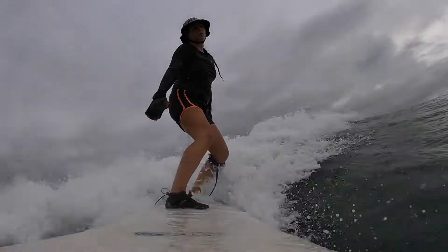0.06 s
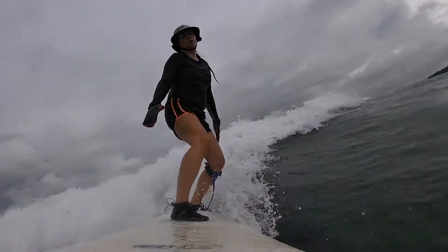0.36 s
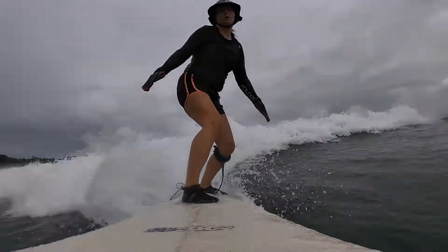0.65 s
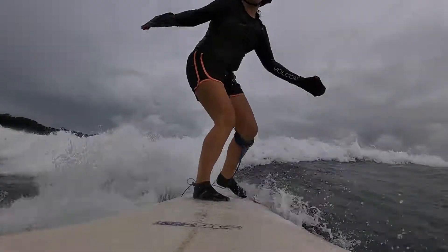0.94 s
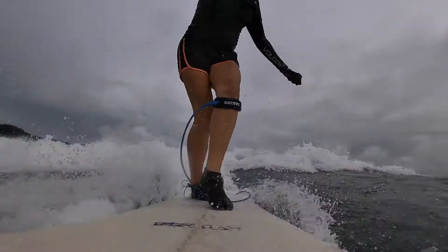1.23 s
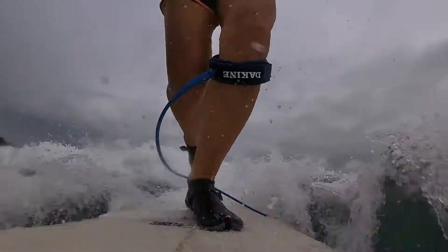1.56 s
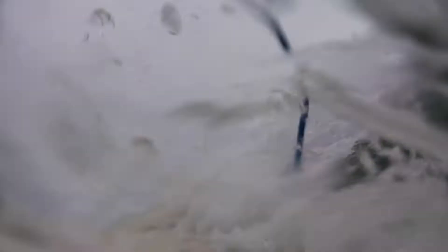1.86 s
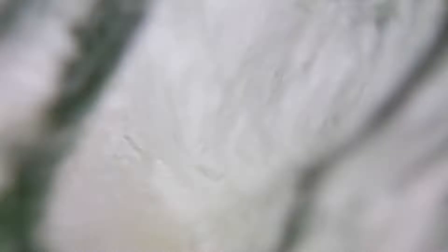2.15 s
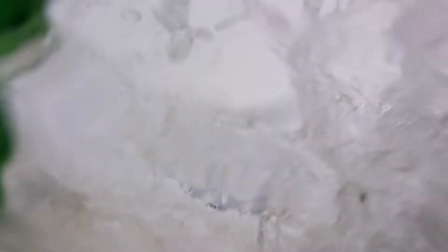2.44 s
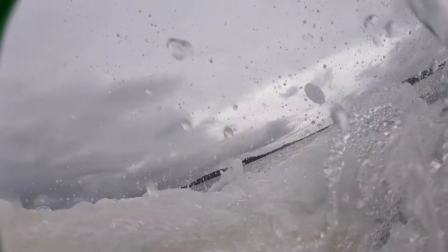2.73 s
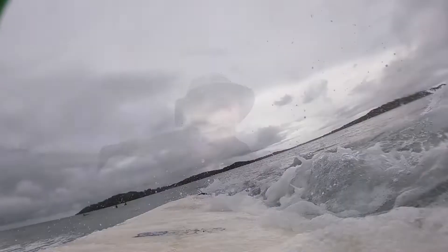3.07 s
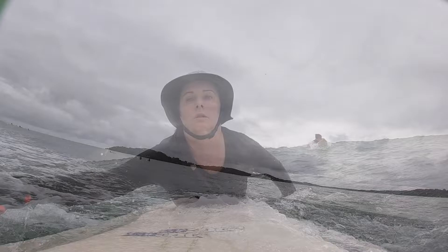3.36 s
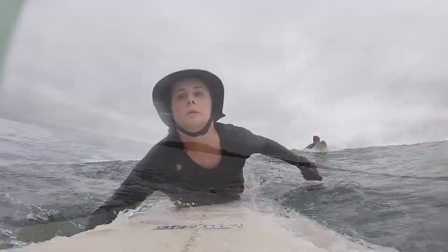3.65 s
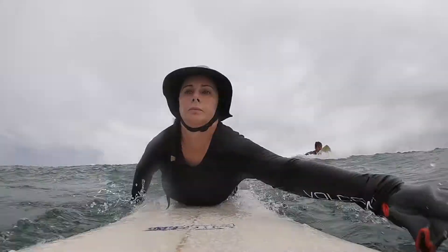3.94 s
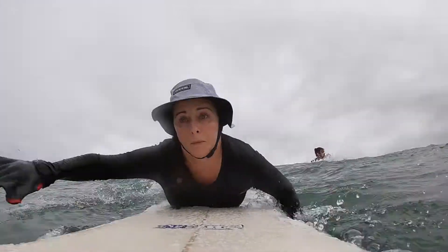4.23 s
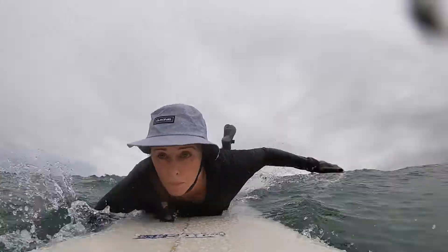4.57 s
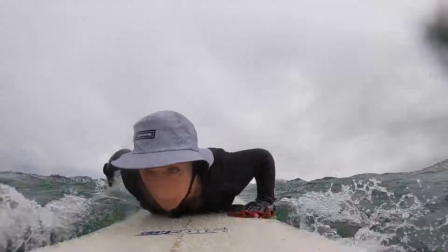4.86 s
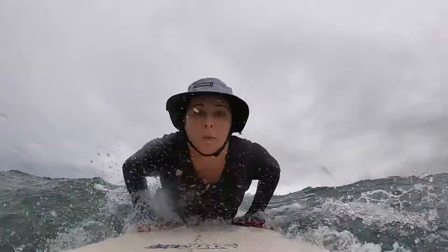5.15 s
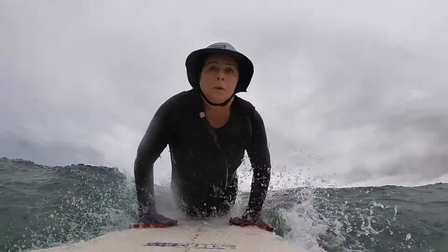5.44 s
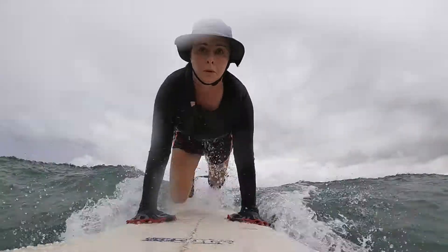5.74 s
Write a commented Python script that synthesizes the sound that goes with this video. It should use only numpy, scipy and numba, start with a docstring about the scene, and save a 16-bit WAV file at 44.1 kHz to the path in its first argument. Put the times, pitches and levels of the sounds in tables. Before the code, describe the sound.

Heard from a microphone mounted on a surfboard at sea, foaming water surges past with gusts of low wind rumble. A burst of hard splashes cuts off the hiss, leaving about a second and a half of dull underwater gurgling and knocking. As the water drains away, the bright wash returns with close paddling splashes, small plops and another windy surge.

```python
"""Whitewater, very close: bubbles slosh, wash and fizz around a microphone in a waterproof housing on
the nose of a surfboard, while wind buffets its port. A wave slaps down and holds it under for about a
second and a half: large bubbles gurgle, trapped air hums and collapsing cavities knock on the housing.
The port drains clear, paddle strokes splash alongside and the rush builds on the next wave."""
import sys
import numpy as np
from scipy import signal
from scipy.fft import rfft, irfft, next_fast_len
from scipy.io import wavfile
from scipy.ndimage import uniform_filter1d, minimum_filter1d
from numba import njit

SR = 44100
rng = np.random.default_rng(int(sys.argv[2]) if len(sys.argv) > 2 else 0)


def transcribe(signal):
    """Save signal, clipped to [-1, 1], as a 16-bit WAV file at the path in sys.argv[1]."""
    frames = np.atleast_2d(signal).T
    limited = np.clip(frames, -1, 1)
    pcm = np.round(limited * 32767).astype(np.int16)
    wavfile.write(sys.argv[1], SR, pcm)


N = 255780
TIME = np.arange(N) / SR

PLUNGE_S, SURFACE_S, CLEAR_S = 1.96, 3.22, 3.62   # the microphone goes under, comes up, has drained
FLOOD_DB_PER_S = 603.5   # how fast water closes over the port
SLOSH_DRAIN_DB_PER_S, WASH_DRAIN_DB_PER_S = 2, 31.5
FIZZ_DRAIN_DB_PER_S, SPRAY_DRAIN_DB_PER_S = 38.5, 30

# Table levels are set ahead of each source's own gain and filters.
# Steady rush around the board: (time [s], wind [dB], wash [dB], fizz [dB], spray [dB])
BOARD_RUSH = [(0, -26.5, -36, -44.5, -72), (.5, -30, -34, -45, -78.5), (.75, -29.5, -31, -41, -66.5),
              (1.15, -31.5, -33, -44, -64), (1.75, -31.5, -35, -37.5, -67),
              (3.85, -38.5, -36, -43.5, -71.5), (4.15, -30, -32, -42, -65),
              (4.55, -34.5, -34.5, -42, -66.5), (5.249, -24.5, -30.5, -41.5, -63.5),
              (5.5, -24.5, -34, -46, -75.5), (5.8, -30, -32, -44, -72)]
# Wave and paddle surges along the rails: (crest time [s], level [dB], port ring [dB], rise [s])
RAIL_SURGES = [(.25, -37.5, -56, 0.053), (.96, -29, -55, 0.078), (1.215, -26, -50, 0.067),
               (1.49, -26, -30, 0.06), (1.585, -25, -35, 0.048), (1.82, -30.5, -41, 0.12),
               (3.653, -31, -36.5, 0.076), (4.06, -42, -35, 0.016), (4.255, -27.5, -30.5, 0.031),
               (4.393, -26, -33, 0.042), (4.76, -29, -35, 0.092), (4.877, -27, -32.5, 0.079),
               (5.17, -28.5, -46, 0.048), (5.67, -33, -59, 0.035), (5.795, -27.5, -48, 0.021)]
# Spray falling around the port: (crest time [s], level [dB], rise [s])
SPRAY_SHOWERS = [(1.635, -55.5, 0.015), (1.851, -47.5, 0.012), (3.592, -61, 0.0093), (3.68, -70, .035),
                 (4.16, -65, 0.0087), (4.425, -55.5, 0.027), (4.615, -61, 0.014), (5.085, -57.5, 0.035)]
# Single large bubbles, close up: (time [s], level [dB], pitch [Hz], t60 [s])
CLOSE_GLUGS = [(0.035, -2, 200, 0.022), (1.226, -6, 352, 0.056), (1.279, -11.5, 207, 0.055),
               (1.842, 0.5, 212, 0.048), (1.958, 3, 394, 0.03), (1.989, 3, 264, 0.029),
               (2.008, 0, 225, 0.087), (2.065, -7, 520, 0.11), (2.229, -7, 483, 0.079),
               (2.28, 1, 229, 0.041), (2.839, -2, 430, 0.032), (2.859, 1.5, 353, 0.018),
               (3.119, -15, 398, 0.028), (3.188, -14, 366, 0.049), (3.217, -0.5, 210, 0.064),
               (3.373, -5, 181, 0.096), (3.512, -6, 195, 0.06), (3.594, -18.5, 1350, 0.032),
               (3.621, -18, 1940, .04), (3.739, -20, 890, 0.031), (4.265, -16.5, 1010, 0.11),
               (4.369, -17.5, 528, 0.24), (4.487, -16, 885, 0.027), (4.616, -6, 700, 0.025),
               (4.712, -15, 470, 0.083), (4.767, -12.5, 965, 0.046), (4.822, -12, 406, 0.057),
               (4.858, -9, 470, 0.07), (4.887, -10.5, 940, .03), (5.034, -19.5, 1830, 0.072),
               (5.068, -19, 1745, 0.056), (5.639, -12.5, 460, 0.07)]
# Highest starting pitch of the gurgling bubbles: (time [s], pitch [Hz])
GURGLE_CEILING = [(2.05, 584), (2.33, 621), (2.52, 748), (2.75, 766), (2.83, 572), (3.02, 560), (3.5, 471)]
# Brief easings of the tumbling water: (time [s], depth [dB], rise [s])
TUMBLE_LULLS = [(2.598, 2.5, 0.027), (2.804, 3.5, 0.041)]
# Small bubbles sweeping past under water: (crest time [s], froth [dB], seethe [dB], rise [s])
PASSING_CLOUDS = [(1.966, -18.5, -30, 0.023), (2.02, -24, -37, 0.02), (2.19, -32.5, -52.5, 0.076),
                  (2.335, -34, -50, 0.04), (2.51, -35.5, -64, 0.11), (2.7, -35, -48.5, 0.014),
                  (2.755, -27.5, -57.5, 0.017), (2.955, -43.5, -54.5, 0.0087), (3.15, -51.5, -67, .06)]
# Cavities collapsing on the submerged housing: (time [s], knock [dB], crack [dB], ring [dB])
CAVITY_KNOCKS = [(2.024, -27.5, -25, -41), (2.045, -21.5, -28, -40), (2.146, -6.5, -39, -49),
                 (2.193, -12.5, -24.5, -35), (2.228, -9.5, -24, -35.5), (2.243, -13, -29, -42),
                 (2.547, -11.5, -51, -49.5), (2.625, -15.5, -40.5, -51), (2.666, -12, -42, -42),
                 (2.734, -8, -39, -43.5), (2.76, -11, -46, -50), (2.841, -14.5, -46, -43.5),
                 (2.946, -18, -57, -43), (2.968, -16, -35.5, -38), (3.079, -14.5, -47, -59)]
# Ringing modes of the housing: (pitch [Hz], level [dB], t60 [s])
HOUSING_MODES = [(1180, 7, 0.08), (1293, 5.5, 0.053), (1490, 5.5, .055), (1900, -16.5, .04),
                 (2430, -7, .06), (2780, -18.5, .05), (3110, -8.5, 0.055), (3450, -14.5, 0.079),
                 (3860, -10, 0.025), (4280, -18, 0.061), (4840, -24, 0.043), (5450, -25, .055)]
# Sheets of water landing on the board: (time [s], body [dB], fizz [dB], decay [s])
BOARD_SLAPS = [(1.167, -27, -52, .03), (1.278, -29, -52, 0.023), (1.802, -13, -26, 0.019),
               (1.838, -14.5, -28, 0.014), (1.855, -23.5, -24.5, 0.052), (1.903, -11, -31, 0.021),
               (1.917, -23, -37, 0.0045), (1.949, -13, -24.5, 0.013), (3.399, -28.5, -51, 0.011),
               (3.454, -23, -63, 0.013), (3.544, -28.5, -56, 0.022), (3.588, -32, -48, 0.015),
               (3.619, -24, -42, 0.012), (3.654, -24, -43, 0.016), (3.74, -27, -37.5, 0.02),
               (4.022, -18, -31, 0.022), (4.048, -19.5, -36, 0.025), (4.083, -11, -44, 0.01),
               (4.219, -17.5, -43, 0.012), (4.251, -18, -42, 0.032), (4.409, -20.5, -46, 0.023),
               (4.677, -23.5, -50, 0.024), (4.719, -26, -52, .02), (4.766, -20, -52, 0.013),
               (4.87, -22, -37, 0.024), (5.143, -16, -42, 0.01), (5.199, -23.5, -50, 0.014),
               (5.633, -23, -55, 0.011)]
# The breaking wave smacking the housing: (time [s], level [dB], pitch [Hz])
HOUSING_SMACKS = [(1.8022, -12, 3570), (1.81, -11, 5600), (1.831, -9, 3000), (1.84, -10, 5700),
                  (1.8514, -9, 2280), (1.8618, -10, 3170), (1.871, -13, 2380), (1.8747, -3, 1900),
                  (1.926, -4.5, 1680), (1.954, -5.5, 2800), (1.958, -11, 3180)]
# Drops striking the housing: (time [s], level [dB])
HOUSING_DROPS = [(1.438, -33.5), (1.4997, -28), (1.669, -27), (1.85, -30), (4.429, -34), (4.45, -33),
                 (5.092, -40)]
# Hum of air trapped at the port: (crest time [s], level [dB], rise [s])
POCKET_SWELLS = [(2.91, -19, 0.05), (3.045, -14.5, 0.02), (3.19, -25.5, 0.041), (3.71, -27.5, 0.018)]
# Gusts and water eddies pushing on the port: (crest time [s], level [dB], rise [s])
PORT_BUFFETS = [(.213, -18.5, 0.01), (.262, -18, 0.013), (.436, -20.5, 0.0067), (.487, -28.5, 0.009),
                (.627, -27, 0.0064), (.79, -23.5, 0.017), (.865, -18.5, 0.023), (1.25, -28.5, 0.056),
                (1.485, -25, 0.0092), (1.55, -27, 0.04), (1.851, -14, 0.014), (2.13, -13.5, 0.034),
                (2.355, -19.5, 0.015), (2.76, -9, 0.0052), (2.97, -14, 0.026), (3.37, -28, 0.032),
                (5.19, -20.5, 0.025)]
# Hiss of the foaming crest behind the board: (loudest time [s], level [dB], rise [s])
CREST_SWELLS = [(0.9, -48, 0.34), (1.68, -52, 0.19)]

# Spectrum of each source at the microphone: (frequency [Hz], relative level [dB])
SLOSH_SPECTRUM = [(90, -29.5), (160, -3), (210, 2.5), (280, -3), (400, -2), (520, -2.5), (650, -9),
                  (900, 1.5), (2000, -57)]
WASH_SPECTRUM = [(300, -30), (550, 0), (750, -1.5), (980, 3), (1250, -1), (1620, -4), (1800, -4), (1940, 1),
                 (2150, -7), (2500, -13.5), (3200, -21.5), (6000, -52.5)]
FIZZ_SPECTRUM = [(1500, -21), (2500, 3.5), (3200, 1), (3850, 2), (4400, -9.5), (5200, -10.5), (6050, -12.5),
                 (6600, -34.5), (7500, -47), (12000, -60)]
SPRAY_SPECTRUM = [(4500, -8), (6500, 0), (7600, -6.5), (9000, -6), (10200, -11.5), (11300, -16),
                  (12400, -17.5), (13200, -30.5), (14500, -50.5)]
GURGLE_SPECTRUM = [(70, -15), (120, -1), (160, 2.5), (260, -3.5), (340, 0), (480, -1.5), (700, -1),
                   (1000, -8.5), (1500, -25.5), (3000, -59.5), (6000, -92.5)]
FROTH_SPECTRUM = [(400, -18), (800, 3.5), (1050, 4.5), (1400, -3), (1640, -3.5), (2000, -8.5),
                  (2700, -16.5), (3200, -31), (4500, -53.5), (7000, -74)]
SEETHE_SPECTRUM = [(1500, -8), (2500, -1), (3300, 1.5), (4000, -11), (4500, -14), (5500, -19.5),
                   (6200, -29.5), (9000, -50), (12000, -83.5)]
KNOCK_SPECTRUM = [(80, -11), (300, -1.5), (600, 18), (1000, -1.5), (1600, -4.5), (2400, -19), (3500, -33.5),
                  (6000, -60)]
CRACK_SPECTRUM = [(900, 3.5), (1900, 7), (3200, -4), (4300, -18.5), (5500, -25), (7000, -34.5),
                  (9000, -68.5)]
SLAP_SPECTRUM = [(120, -35), (400, 6), (1000, 6.5), (1500, 1.5), (1950, 3.5), (2500, -7.5), (3800, -2),
                 (6000, -47), (10000, -57)]
SLAP_FIZZ_SPECTRUM = [(1500, -43), (2600, 1.5), (3800, 0), (5000, -7), (6100, -9.5), (7200, -38),
                      (10000, -30), (14000, -48)]
DROP_SPECTRUM = [(800, -7), (2500, -4.5), (3700, -0.5), (5000, -4.5), (6100, -8.5), (7300, -29),
                 (9500, -18.5), (12000, -48), (15000, -42)]
WIND_SPECTRUM = [(12, -26), (25, 0), (42, 4), (57, 5.5), (80, 1.5), (125, 0.5), (180, -6.5), (300, -15.5),
                 (700, -73)]
CREST_SPECTRUM = [(3000, -23), (4400, 9), (5200, -6.5), (6100, -1), (6700, -31), (8000, -23)]


def whitewater():
    """All round the nose, big bubbles slosh, middling ones wash, the smallest burst as fizz and spray."""
    slosh_gain, wash_gain, fizz_gain, spray_gain = whitewater_gains()
    slosh = bubble_cloud(per_s=600, low_hz=121, high_hz=744, cycles=11.5, spread_db=1, climb=0.027)
    wash = bubble_cloud(per_s=2200, low_hz=502, high_hz=2680, cycles=34, spread_db=1, climb=0.17)
    fizz = bubble_cloud(per_s=2300, low_hz=2030, high_hz=6710, cycles=46, spread_db=0, climb=0.026)
    spray = bubble_cloud(per_s=420, low_hz=6130, high_hz=13000, cycles=11, spread_db=2, climb=0)
    slosh = foam(slosh, SLOSH_SPECTRUM, hiss_db=-8.5, flutter_db=1, flutter_hz=42)
    wash = foam(wash, WASH_SPECTRUM, hiss_db=7, flutter_db=1.45, flutter_hz=16)
    fizz = from_db(0.5) * foam(fizz, FIZZ_SPECTRUM, hiss_db=4, flutter_db=0.94, flutter_hz=24)
    spray = from_db(5.5) * foam(spray, SPRAY_SPECTRUM, hiss_db=4.5, flutter_db=1, flutter_hz=40)
    return slosh_gain * slosh + wash_gain * wash + fizz_gain * fizz + spray_gain * spray


def whitewater_gains():
    """Surges lift slosh, wash and fizz above the steady rush; showers add to fizz and spray."""
    wind_db, wash_db, fizz_db, spray_db = rush_db()
    surge, shower = surging(), swells(*np.transpose(SPRAY_SHOWERS))
    slosh_db = -33.5 + 0.69 * (wind_db - wind_db.mean())   # follows part of the wind's swing
    slosh = np.hypot(from_db(slosh_db), from_db(2.5) * surge)
    wash = np.hypot(from_db(wash_db), surge)
    fizz = np.hypot(from_db(fizz_db), from_db(-15) * surge)
    fizz = np.hypot(fizz, from_db(19.5) * shower)
    spray = np.hypot(from_db(spray_db), shower)
    return (slosh * port_open(SLOSH_DRAIN_DB_PER_S), wash * port_open(WASH_DRAIN_DB_PER_S),
            fizz * port_open(FIZZ_DRAIN_DB_PER_S), spray * port_open(SPRAY_DRAIN_DB_PER_S))


def plops():
    """Each surge folds in a few larger bubbles that stand out of the wash and chirp upwards."""
    bubbles = bubble_cloud(per_s=150, low_hz=380, high_hz=2000, cycles=26, spread_db=2.5, climb=0.12)
    gain = from_db(-7) * surging() * port_open(WASH_DRAIN_DB_PER_S)
    return gain * rms_one(coloured(bubbles, WASH_SPECTRUM))


def glugs(climb=0.12, attack_cycles=0.62):
    """Close gulps of air swell roundly as they pinch off, then ring down while their pitch climbs."""
    age, out = TIME[:SR // 5], np.zeros(N + SR)
    for start, db, hz, t60 in CLOSE_GLUGS:
        cycles = hz * age * (1 + climb * age / t60 / 2)
        envelope = (1 - np.exp(-cycles / attack_cycles)) * from_db(db - 60 * age / t60)
        out[int(start * SR):][:len(age)] += envelope * np.sin(2 * np.pi * cycles)
    return out[:N]


def underwater_bubbles(thinning_db_per_s=5):
    """Large bubbles tumble right against the housing; the water takes the treble out of smaller ones."""
    times, froth_db, seethe_db, rises = np.transpose(PASSING_CLOUDS)
    gurgle_gain = tumbling()
    thinning = gurgle_gain * from_db(-thinning_db_per_s * since(PLUNGE_S))   # small bubbles go sooner
    froth_gain = np.hypot(from_db(-24.5) * thinning, swells(times, froth_db, rises))
    seethe_gain = np.hypot(from_db(-53) * thinning, swells(times, seethe_db, rises))
    top_hz = np.interp(TIME, *np.transpose(GURGLE_CEILING))
    gurgle = bubble_cloud(per_s=900, low_hz=125, high_hz=top_hz, cycles=24, spread_db=1.6, climb=0.11)
    froth = bubble_cloud(per_s=1500, low_hz=604, high_hz=2695, cycles=26, spread_db=-0.5, climb=0.033)
    seethe = bubble_cloud(per_s=900, low_hz=2494, high_hz=5550, cycles=30, spread_db=1.5, climb=0.01)
    gurgle = rms_one(coloured(gurgle, GURGLE_SPECTRUM))
    froth = foam(froth, FROTH_SPECTRUM, hiss_db=-2.5, flutter_db=2.5, flutter_hz=51)
    seethe = from_db(-3) * foam(seethe, SEETHE_SPECTRUM, hiss_db=9, flutter_db=2, flutter_hz=23)
    return gurgle_gain * gurgle + froth_gain * froth + seethe_gain * seethe


def knocks(knock_s=0.0039, crack_s=0.0047):
    """Under water, cavities collapse on the housing: they knock, crack and set it ringing."""
    times, knock_db, crack_db, ring_db = np.transpose(CAVITY_KNOCKS)
    shudder = rng.choice([-1, 1], N)
    out = coloured(shudder * bursts(times, knock_db, knock_s), KNOCK_SPECTRUM)
    out += coloured(shudder * bursts(times, crack_db, crack_s), CRACK_SPECTRUM)
    age = TIME[:SR // 8]
    for start, db in zip(times, ring_db):
        for k, (hz, mode_db, t60) in enumerate(HOUSING_MODES):
            detune, strength = rng.standard_normal(2)
            loaded_hz = hz * (1 + 0.0073 * detune)   # the changing load of water shifts the ring
            decay = from_db(db + mode_db + 2 * strength - 60 * age / t60)
            out[int(start * SR):][:len(age)] += (-1) ** k * decay * np.sin(2 * np.pi * loaded_hz * age)
    return through_housing(out)


def slaps():
    """A sheet of water lands on the board at once and breaks into a short, dense shower of grains."""
    times, body_db, fizz_db, decays = np.transpose(BOARD_SLAPS)
    body = bubble_cloud(per_s=1600, low_hz=299, high_hz=3080, cycles=5.9, spread_db=3.5, climb=0.05)
    fizz = bubble_cloud(per_s=3300, low_hz=2100, high_hz=9600, cycles=2.4, spread_db=5, climb=0.05)
    fizz = foam(fizz, SLAP_FIZZ_SPECTRUM, hiss_db=-3, flutter_db=1.5, flutter_hz=150)
    body = from_db(-2.5) * foam(body, SLAP_SPECTRUM, hiss_db=-9.5, flutter_db=1, flutter_hz=130)
    return bursts(times, body_db, decays) * body + bursts(times, fizz_db, decays) * fizz


def smacks(cycles=12.6):
    """Water hitting the housing flat on gives hard, very short cracks."""
    times, db, hz = np.transpose(HOUSING_SMACKS)
    starts = (times * SR).astype(int)
    cracks = ring_bubbles(starts, from_db(db), 2 * np.pi * hz / SR, cycles * SR / hz, climb=0.)
    return through_housing(cracks)


def drops():
    """Drops tick sharply on the housing, right by the microphone."""
    times, db = np.transpose(HOUSING_DROPS)
    clicks = np.zeros(N)
    clicks[np.round(times * SR).astype(int)] = from_db(db)
    return from_db(27) * coloured(clicks, DROP_SPECTRUM)


def air_pocket(hz=165, waver=0.02):
    """Air trapped at the submerged port swings at one wavering pitch."""
    phase = 2 * np.pi * np.cumsum(hz * (1 + waver * drift(21))) / SR
    hum = np.sqrt(2) * np.sin(phase) * from_db(2.8 * drift(4.5))
    return swells(*np.transpose(POCKET_SWELLS)) * hum


def port_ring(hz=1920, width_hz=230):
    """Surges blow across the cavity of the microphone port, which rings at one hollow pitch."""
    times, _, ring_db, rises = np.transpose(RAIL_SURGES)
    cavity = signal.butter(2, [hz - width_hz / 2, hz + width_hz / 2], "band", fs=SR, output="sos")
    ring = rms_one(signal.sosfilt(cavity, rng.standard_normal(N)))
    return swells(times, ring_db, rises) * port_open(WASH_DRAIN_DB_PER_S) * ring


def buffeting():
    """Eddies of wind, or of water while submerged, hit the microphone port in lumps."""
    wind_db = rush_db()[0]
    steady = np.hypot(from_db(wind_db), from_db(-8) * tumbling())
    gain = from_db(1.5) * np.hypot(steady, swells(*np.transpose(PORT_BUFFETS)))
    eddies = rng.standard_normal(N) * from_db(1.9 * drift(11))
    return gain * rms_one(coloured(eddies, WIND_SPECTRUM))


def crest_hiss():
    """Farther back, countless tiny bubbles bursting in the crest merge into a smooth, high hiss."""
    gain = swells(*np.transpose(CREST_SWELLS)) * port_open(FIZZ_DRAIN_DB_PER_S)
    return gain * rms_one(coloured(rng.standard_normal(N), CREST_SPECTRUM))


def rush_db():
    """Steady levels of wind, wash, fizz and spray."""
    times, *columns = np.transpose(BOARD_RUSH)
    return [np.interp(TIME, times, db) for db in columns]


def surging():
    """Strength of the surges along the rails."""
    times, db, _, rises = np.transpose(RAIL_SURGES)
    return swells(times, db, rises)


def tumbling(sag_db_per_s=3.5, release_db_per_s=37):
    """Strength of the water overhead: hardest at the plunge, easing off, released on surfacing."""
    boost_db = 4.5 * np.exp(-(since(PLUNGE_S) / 0.082) ** 2)   # the first rush of air dragged under
    loss_db = (FLOOD_DB_PER_S * until(PLUNGE_S) + sag_db_per_s * since(PLUNGE_S)
               + release_db_per_s * since(SURFACE_S))
    lull_db = sum(depth * np.exp(-((TIME - s) / rise) ** 2 / 2) for s, depth, rise in TUMBLE_LULLS)
    return from_db(-15 + boost_db - loss_db - lull_db)


def port_open(drain_db_per_s, sealed_db_per_s=81):
    """Share of airborne sound reaching the microphone: cut at the plunge, back as the port drains."""
    blocked_db = drain_db_per_s * until(CLEAR_S) + sealed_db_per_s * until(SURFACE_S)
    return from_db(-np.minimum(FLOOD_DB_PER_S * since(PLUNGE_S), blocked_db))


def through_housing(x):
    """The waterproof housing passes little of the top treble."""
    return signal.sosfilt(signal.butter(6, 6200, fs=SR, output="sos"), x)


def bubble_cloud(per_s, low_hz, high_hz, cycles, spread_db, climb):
    """Bubbles born at random, of uneven size and pitch, with even power per Hz; rms 1."""
    chance, place, size, life = rng.random((4, N))
    born = np.flatnonzero(chance < per_s / SR)
    hz = (low_hz * (high_hz / low_hz) ** place)[born]
    heights = hz * from_db(spread_db * np.minimum(-np.log(size[born]), 4)) * (-1) ** born
    lengths = cycles * (0.5 + life[born]) * SR / hz
    return rms_one(ring_bubbles(born, heights, 2 * np.pi * hz / SR, lengths, climb))


@njit
def ring_bubbles(starts, heights, phase_steps, lengths, climb):
    """Each bubble is a sine that dies by 60 dB over its length in samples while its pitch climbs."""
    out = np.zeros(N)
    for k in range(len(starts)):
        height, phase, decay = heights[k], 0., np.exp(-np.log(1000) / lengths[k])
        for i in range(min(int(lengths[k]), N - starts[k])):
            out[starts[k] + i] += height * np.sin(phase)
            phase += phase_steps[k] * (1 + climb * i / lengths[k])
            height *= decay
    return out


def foam(grains, spectrum, hiss_db, flutter_db, flutter_hz):
    """Near grains over the smooth hiss of countless far ones, coming in clumps; rms 1."""
    mix = grains + from_db(hiss_db) * rng.standard_normal(N)
    return rms_one(coloured(mix * from_db(flutter_db * drift(flutter_hz)), spectrum))


def swells(times, db, rises, fall_ratio=1.37):
    """Gain curve of smooth swells that rise to a crest and fall more slowly; their powers add."""
    power = np.zeros(N)
    for crest, gain, rise in zip(times, from_db(db), rises):
        near = slice(max(int((crest - 4 * rise) * SR), 0), int((crest + 5 * rise) * SR))
        age = TIME[near] - crest
        width = np.where(age < 0, rise, rise * fall_ratio)
        power[near] += (gain * np.exp(-(age / width) ** 2 / 2)) ** 2
    return np.sqrt(power)


def bursts(times, db, decays, attack_s=0.00057):
    """Envelope of sudden bursts, each falling to 1/e at its decay time."""
    age, out = TIME[:SR // 5], np.zeros(N + SR)
    attack = 1 - np.exp(-age / attack_s)
    for start, gain, decay in np.broadcast(times, from_db(db), decays):
        out[int(start * SR):][:len(age)] += gain * attack * np.exp(-(age / decay) ** 2)
    return out[:N]


def coloured(x, spectrum, roll_off_db_per_octave=26):
    """Minimum-phase filter that rolls off above the spectrum's last point; white noise keeps its power."""
    size = 2 * next_fast_len(N // 2 + SR // 10)
    hz, db = np.transpose(spectrum)
    octaves = np.log2((np.fft.rfftfreq(size, 1 / SR) + 1) / hz[-1])
    shape_db = np.interp(octaves, np.log2(hz / hz[-1]), db)
    gain = rms_one(from_db(shape_db - roll_off_db_per_octave * np.maximum(octaves, 0)))
    cepstrum = irfft(np.log(gain))[:size // 2]
    cepstrum[1:] *= 2
    return irfft(rfft(x, size) * np.exp(rfft(cepstrum, size)))[:N]


def drift(hz, hop=40, settle=2000):
    """Slow random wander with a spread of 1."""
    pole = np.exp(-2 * np.pi * hz * hop / SR)
    noise = rng.standard_normal(N // hop + settle + 2)
    slow = signal.lfilter([1], [1, -2 * pole, pole * pole], noise)[settle:]
    return np.interp(np.arange(N) / hop, np.arange(len(slow)), rms_one(slow))


def since(s):
    return np.maximum(TIME - s, 0)


def until(s):
    return np.maximum(s - TIME, 0)


def from_db(db):
    return 10 ** (np.asarray(db) / 20)


def rms_one(x):
    return x / np.sqrt(np.mean(x ** 2) + 1e-20)


def scene():
    """Sea and wind at one microphone on the nose of the board, in mono."""
    sea = whitewater() + port_ring() + plops() + crest_hiss() + slaps() + smacks() + drops() + glugs()
    submerged = underwater_bubbles() + air_pocket() + knocks()
    return (sea + submerged + buffeting())[None]


def record(dry, ceiling=0.95, cutoff_hz=13500):
    """After the microphone, a look-ahead limiter holds down the peaks and the top treble is cut."""
    allowed = minimum_filter1d(ceiling / np.maximum(np.abs(dry), ceiling), size=301)
    gain = uniform_filter1d(uniform_filter1d(allowed, size=151), size=151)
    return signal.sosfilt(signal.ellip(8, 0.1, 80, cutoff_hz, fs=SR, output="sos"), dry * gain)


dry = scene()
out = record(dry)
transcribe(out)
```